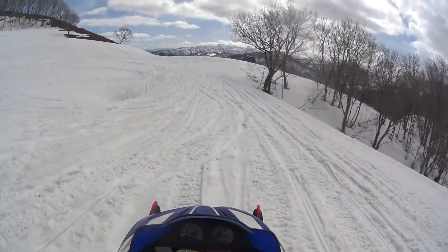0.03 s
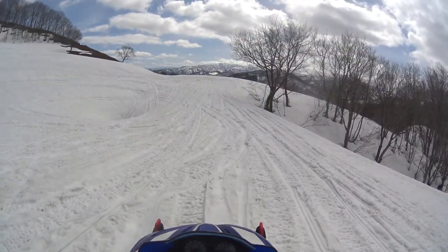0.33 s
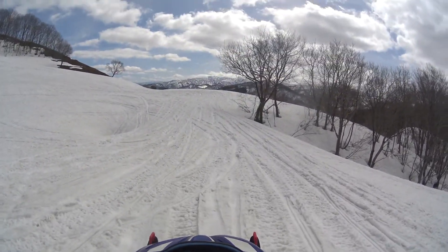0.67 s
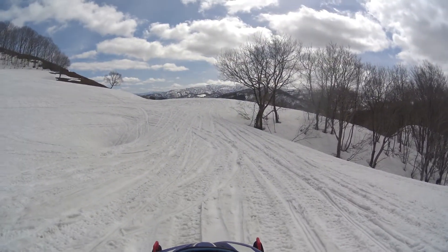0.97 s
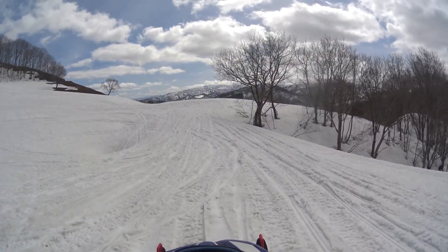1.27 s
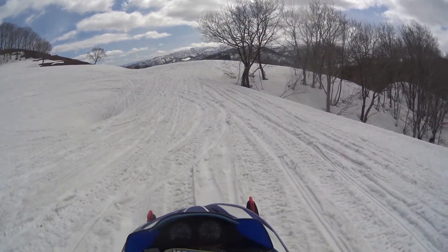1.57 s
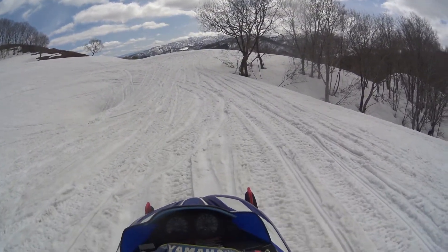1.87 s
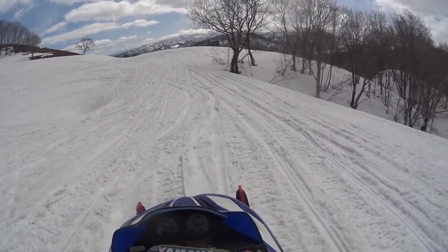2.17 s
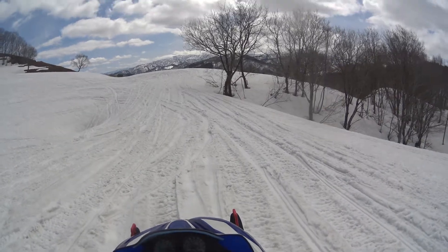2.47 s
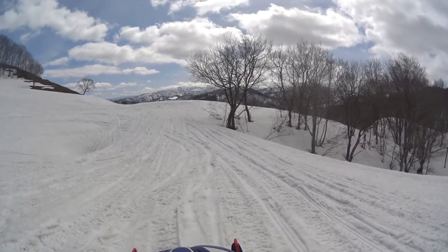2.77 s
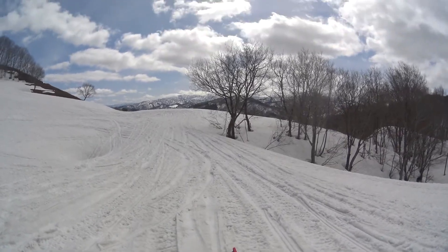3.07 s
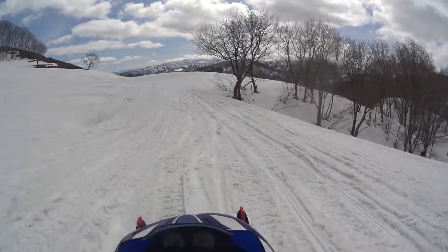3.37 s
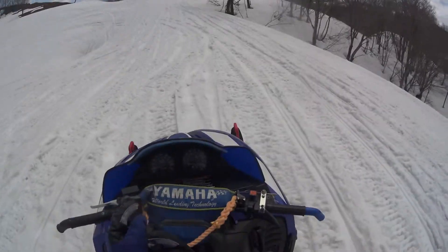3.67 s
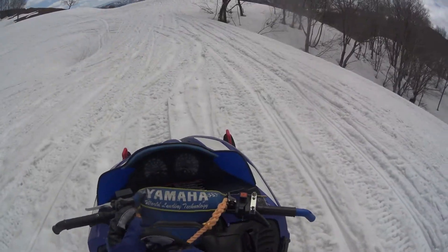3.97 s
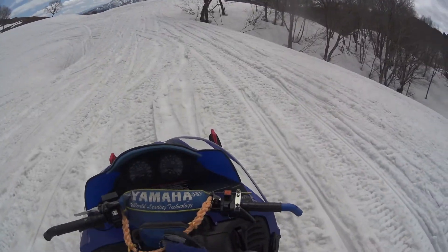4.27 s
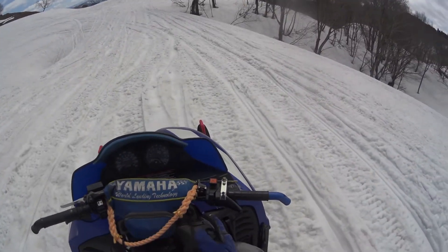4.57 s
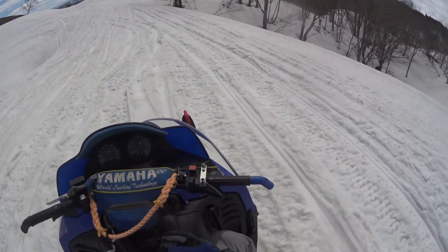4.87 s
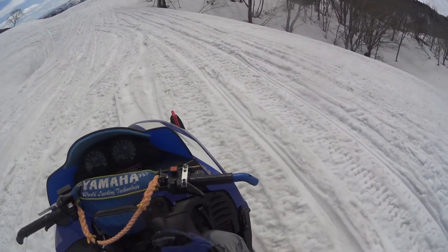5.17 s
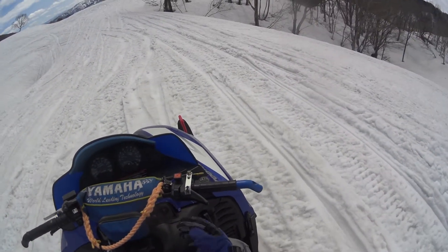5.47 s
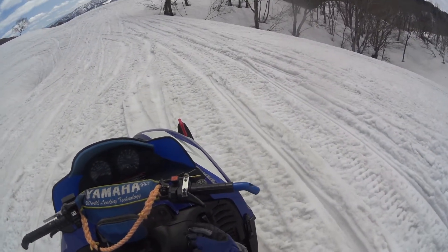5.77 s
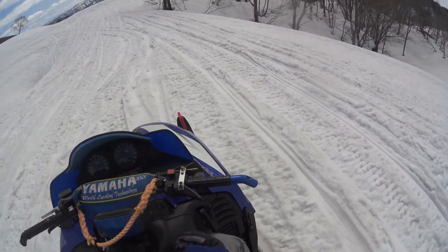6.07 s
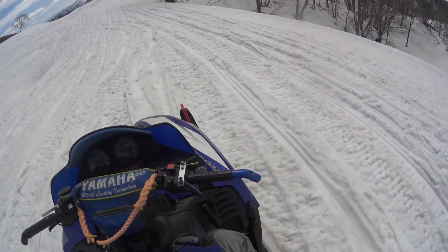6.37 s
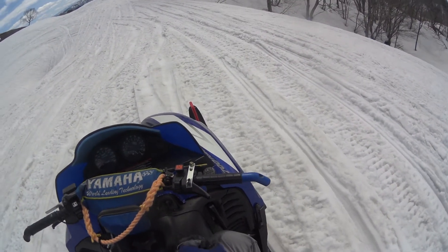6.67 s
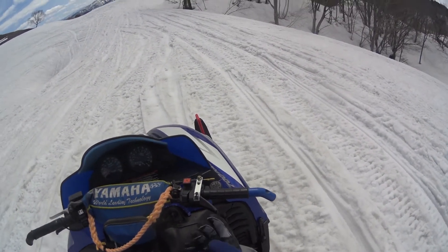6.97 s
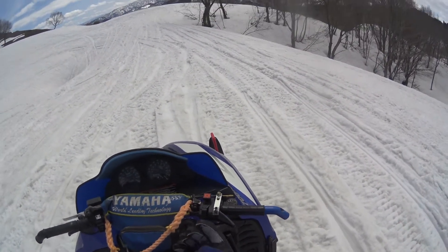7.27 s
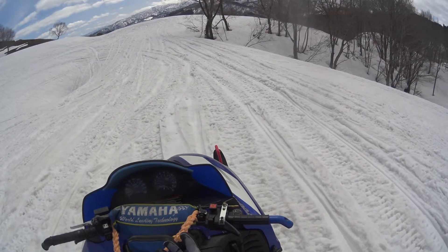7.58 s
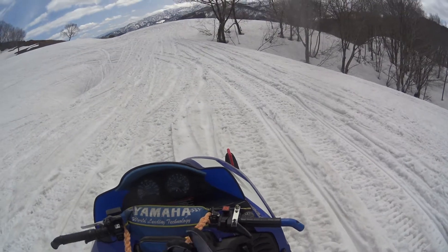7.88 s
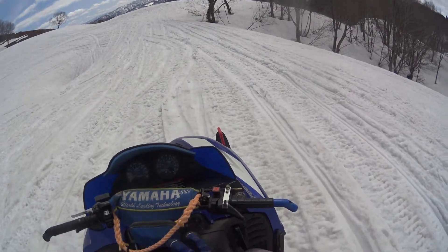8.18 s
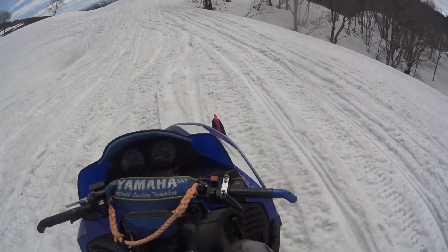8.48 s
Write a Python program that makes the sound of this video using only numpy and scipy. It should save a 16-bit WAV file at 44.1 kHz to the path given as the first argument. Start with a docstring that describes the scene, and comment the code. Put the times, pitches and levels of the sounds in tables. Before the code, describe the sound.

A two-stroke snowmobile engine idles close by for about eight and a half seconds, heard outdoors from a microphone on the rider's head. The exhaust has a low, lumpy throb, with stronger pops coming unevenly several times a second, and its pitch wavers only slightly. Over it run a fine mechanical clatter and the fast metallic rattle of a loose clutch. Sharp, briefly ringing knocks come at irregular moments throughout, along with occasional faint, high buzzes of small metal parts.

The engine swells a little around 2 seconds, where a dull double thud bumps the microphone, then eases back. At about 3.5 seconds comes a second cluster of thuds with a plastic knock and a short rub. From there the engine sounds closer and a little louder, with more prominent rattle and slightly thinner bass, and it keeps idling to the end.

```python
"""Snowmobile idling on a snowy slope

A three-cylinder two-stroke, heard from a camera on the rider's head. Every stroke pumps the exhaust
pipe, but only some burn hard. The loose clutch rattles once a turn over the engine's clatter, with a
hard knock now and then. The camera is bumped twice; the engine swells as the rider leans in, and
its tone shifts as the rider looks down."""
import sys
import numpy as np
from scipy import signal
from scipy.fft import rfft, irfft, next_fast_len
from scipy.io import wavfile
from scipy.ndimage import uniform_filter1d

SR = 44100
rng = np.random.default_rng(int(sys.argv[2]) if len(sys.argv) > 2 else 0)


def dump(signal):
    """Clip the signal to [-1, 1] and save it as 16-bit WAV at the path in sys.argv[1]."""
    limited = np.clip(np.atleast_2d(signal).T, -1, 1)
    pcm = np.round(limited * 32767).astype(np.int16)
    wavfile.write(sys.argv[1], SR, pcm)


N = 380141
T = np.arange(N) / SR
SIZE = next_fast_len(N + SR // 2)
FREQ = np.arange(SIZE // 2 + 1) * SR / SIZE

# the rider's head: (time [s], tilt [0 looking ahead, 1 down at the hood])
HEAD_TILT = [(0, 0.021), (3.36, 0), (3.52, 0.46), (4.4, 0.89), (8.62, 0.69)]
# pumping strength, one value a cylinder: (level [dB])
CYLINDER_LEVELS = [-0.5, -7.5, 4]
# clutch resonances: (frequency [Hz], width [Hz], level [dB])
CLUTCH_MODES = [(1048, 33, -18), (1123, 66, -15), (1238, 54.6, -3), (1312.6, 40, 0.5), (1353, 59, -1.5),
                (1404, 46, -3.5), (1581, 49, -10), (2022, 29, -12), (2130.5, 23, -9.5), (2685, 79, -20),
                (4900, 310, -38.5)]
# hardest clutch knocks, and at 3.43 s a ring struck along with the camera's bump: (time [s], relative peak
# [dB], ring pitch [Hz], nominal ring length [s])
HARD_KNOCKS = [(0.025, -9.5, 1290, 0.015), (0.085, -12.5, 1280, 0.0078), (0.4587, -8.5, 1420, 0.0056),
               (0.815, -9.5, 1300, 0.0057), (0.9718, -10.5, 1300, 0.0061), (1.159, -19, 1320, 0.0088),
               (1.27, -12, 1260, 0.017), (1.9218, -5, 1326, 0.006), (2.0137, -4, 1470, 0.0068),
               (2.174, -7.5, 1346, 0.0111), (2.219, -9, 1440, 0.0089), (2.579, -14, 1310, 0.013),
               (2.7405, -13, 1360, 0.0065), (2.79, -13.1, 1330, 0.007), (3.065, -13.5, 1380, 0.0065),
               (3.113, -12, 1365, 0.012), (3.4278, -9, 1290, 0.0055), (3.638, -4.5, 1240, 0.0084),
               (4.2412, -6, 1330, 0.0126), (4.5756, -4.5, 1310, 0.0061), (4.7646, -7, 1325, 0.021),
               (4.8688, -7.5, 1350, 0.0036), (5.1895, -10.0, 1320, 0.0064), (5.2799, -6, 1333, 0.0088),
               (5.557, -3.5, 1360, 0.016), (5.6363, -10.5, 1315, 0.0072), (5.9727, -6, 1287, 0.0062),
               (6.3368, -10.5, 1313, 0.0118), (6.5605, -6, 1320, 0.0081), (6.6743, -7.8, 1420, 0.0059),
               (7.032, -6, 1290, 0.0055), (7.1185, -8.5, 1360, 0.0043), (7.5676, -8, 1380, 0.011),
               (7.7284, -5.5, 1385, 0.0069), (7.7705, -13, 1350, 0.0072), (7.92, -9.5, 1330, 0.0096),
               (7.9532, -6.5, 1320, 0.0071), (8.018, -9.5, 1316, 0.013), (8.0525, -13.5, 1365, 0.0049),
               (8.295, -10.5, 1330, 0.0062), (8.3845, -5, 1300, 0.0076), (8.4288, -6.5, 1380, 0.007),
               (8.5115, -6.5, 1300, 0.012), (8.549, -9, 1341, 0.007)]


def amp(db):
    """Decibels to gain."""
    return 10 ** (np.asarray(db) / 20)


def unit(x):
    """Scale to a standard deviation of 1."""
    return x / np.std(x)


def curve(rows):
    """A (time, value) table as an automation curve."""
    return np.interp(T, *np.transpose(rows))


def shape(points):
    """A (frequency, value) table drawn over log frequency."""
    hz, value = np.transpose(points)
    return np.interp(np.log(FREQ + 1), np.log(hz), value)


def through(x, response):
    """Filter by a frequency response."""
    return irfft(rfft(x, SIZE) * response, SIZE)[:N]


def causal(gain):
    """The response with this gain that rings only after it is struck."""
    cepstrum = irfft(np.log(gain + 1e-6), SIZE)
    cepstrum[1:SIZE // 2] *= 2
    cepstrum[SIZE // 2 + 1:] = 0
    return np.exp(rfft(cepstrum))


def body(modes, skirt):
    """Response of (frequency, width, level) resonances; a higher skirt makes deeper valleys."""
    power = 0
    for hz, width, db in modes:
        detuning = (FREQ ** 2 - hz ** 2) / (FREQ * width + 1)
        power += amp(2 * db) / (1 + detuning ** 2 / skirt) ** skirt
    return causal(np.sqrt(power))


def clicks(times, sizes):
    """Single clicks at the given times."""
    return np.bincount(np.clip(np.asarray(times) * SR, 0, N - 1).astype(int), sizes, N)


def noise():
    """White noise."""
    return rng.standard_normal(N)


def wobble(hz):
    """Random drift of spread 1, rolling off above hz."""
    return unit(through(noise(), np.exp(-(FREQ / hz) ** 2)))


def hiss(level_db=-48.0):
    """The microphone's noise floor: a low rumble with faint hiss on top."""
    # (frequency [Hz], relative level [dB])
    floor_eq = [(20, 9.5), (60, 28.5), (300, 12), (2000, -42), (8000, -7.5), (11000, -12.5)]
    return unit(through(noise(), amp(shape(floor_eq)))) * amp(level_db)


def shake(turns, ahead_db=-50, down_db=-55):
    """The crankshaft rocks the whole sled once a turn."""
    return np.sin(2 * np.pi * turns) * amp(ahead_db + curve(HEAD_TILT) * (down_db - ahead_db))


def tinkles(fade_s=0.0192, grain_db=3):
    """Small loose metal parts buzz briefly in the engine bay."""
    # metallic ticks: (time [s], level [dB])
    ticks = [(0.179, -49), (0.584, -46), (1.056, -51), (1.854, -43), (2.463, -44), (5.115, -40),
             (5.325, -40), (7.163, -42), (7.806, -50), (8.227, -43), (8.563, -46)]
    swell = sum(amp(db) * np.exp(-abs(T - s) / fade_s) for s, db in ticks)
    metal = body([(3900, 300, -5), (4450, 300, -5), (4920, 430, 0.5), (5450, 600, -7)], skirt=1.4)
    grit = noise() * amp(grain_db * noise())
    return unit(through(grit, metal)) * swell


def bumps(rub_db=-9, rub_s=0.061):
    """Dull thuds in the camera mount, each with a plastic knock and a short rub."""
    # two clusters of hits: (time [s], thud peak [dB], knock against thud [dB])
    hits = [(2.122, -9.5, -34), (2.17, -14, -30), (3.427, -15.5, -21), (3.455, -9.5, -2),
            (3.47, -14.5, -26), (3.529, -16.5, -19), (3.552, -12, -11)]
    mount = body([(42, 26, -4), (62, 22, -6), (103.3, 22, 12), (152, 200, -1), (360, 170, -11)],
                 skirt=2.7)
    case = body([(460, 180, 1), (675, 110, 3), (1100, 180, -7), (1900, 600, -18)], skirt=2.3)
    times, db, knock_db = np.transpose(hits)
    blows = clicks(times, amp(db))
    tails = signal.lfilter([1], [1, -np.exp(-1 / (rub_s * SR))], blows)
    rub = tails * noise() * amp(rub_db) / np.sqrt(rub_s * SR)
    thuds = through(blows + rub, mount / abs(irfft(mount)).max())
    plastic = through(clicks(times, amp(db + knock_db)), case / abs(irfft(case)).max())
    return thuds + plastic


def treble_drift(x, edge_hz=3200):
    """The top end rises and falls a little."""
    # high shelf: (time [s], gain [dB])
    shelf = [(0, 1), (1.3, 0), (1.6, .5), (2.4, 0.5), (2.7, 0), (3.25, -0.5), (3.5, -0.5), (4.5, -0.6),
             (5.2, -0.7), (5.7, -.3), (6.5, 1.5), (7.5, -0.7043), (8.62, 0)]
    highs = through(x, 1 - 1 / (1 + (FREQ / edge_hz) ** 8))
    return x + highs * (amp(curve(shelf)) - 1)


def clatter(turns, slap, level_db, turn_db=0.92, stroke_db=0.17, slap_db=0.84, flutter_db=0.57):
    """Pistons, fan and intake: fine ticks that swell with each turn, stroke and burn."""
    # tone looking ahead, shaded by the windscreen: (frequency [Hz], gain [dB])
    ahead_eq = [(300, -8.5), (480, 15), (700, 16.5), (810, 10.5), (1000, 17.5), (1500, 23), (1720, 20),
                (2050, 23), (2300, 13.5), (2800, 15), (3400, 2), (4300, -3.5), (5000, -3), (6200, -9),
                (8000, -25)]
    # tone looking down: (frequency [Hz], gain [dB])
    down_eq = [(300, -1.5), (480, 12.5), (800, 7.5), (1050, 14), (1550, 23), (1950, 23), (2140, 15),
               (2350, 5.5), (2800, 10.5), (3300, 3), (4000, 2.5), (5000, -1.7), (6500, -9), (8000, -27)]
    down = curve(HEAD_TILT)
    ticks = unit(noise() * amp(4.0 * noise()))  # 4 dB of grain
    beat_db = turn_db * np.cos(2 * np.pi * clutch_turns(turns))
    beat_db += stroke_db * np.cos(2 * np.pi * len(CYLINDER_LEVELS) * turns)
    ticks *= amp(beat_db + slap_db * slap + flutter_db * wobble(hz=34))
    shaded = through(ticks, causal(amp(shape(ahead_eq))))
    exposed = through(ticks, causal(amp(shape(down_eq))))
    return treble_drift((1 - down) * shaded + down * exposed) * amp(level_db)


def clutch_turns(turns):
    """The turn count, nudged so that the clutch's play closes right on each hard knock."""
    times = np.transpose(HARD_KNOCKS)[0]
    at_knocks = np.interp(times, T, turns)
    turns_between = np.maximum(np.round(np.diff(at_knocks)), 1)
    whole = np.append(0, np.cumsum(turns_between))
    return turns + np.interp(T, times, whole - at_knocks)


def sheave_ring():
    """One knock on the sheaves: a quick run of contacts, so the ring builds over a few cycles."""
    smear = np.exp(-2j * np.arctan2(FREQ * 700, 1330 ** 2 - FREQ ** 2))
    ring = irfft(body(CLUTCH_MODES, skirt=1.69) * smear)[:SR // 8]
    return ring / abs(ring).max()


def clutch_rattle(turns, level_db, fade_db=4.0, taps_per_s=4000, blow_db=3, uneven_db=2.0,
                  ceiling_db=5, lull_db=2, lull_s=0.012, hood_db=-11):
    """Once a turn the loose weights hit the sheaves, then chatter in their play; the hood rings along."""
    # hood resonances, heard with the head up: (frequency [Hz], width [Hz], level [dB])
    hood_modes = [(1013.5, 16.6, -3), (1127, 17.6, 2), (1238, 11.6, 2), (2074, 14, -6.5)]
    play = clutch_turns(turns)
    taps = (rng.random(N) < taps_per_s / SR) * np.sign(noise())
    taps *= amp(-fade_db * (play % 1))
    times = T[1:][np.diff(np.floor(play)) > 0]
    blows = clicks(times, amp(blow_db + uneven_db * rng.standard_normal(len(times))))
    chatter = unit(through(taps, body(CLUTCH_MODES, skirt=1.65)))
    chatter += signal.fftconvolve(blows, sheave_ring())[:N]
    power = uniform_filter1d(chatter ** 2, SR // 150) / amp(2 * ceiling_db)
    chatter /= (1 + power ** 2) ** .25  # soft limiter
    # around a hard knock the weights lift clear and the chatter ducks
    hard_times = np.transpose(HARD_KNOCKS)[0]
    nearest = np.searchsorted((hard_times[1:] + hard_times[:-1]) / 2, T)
    lifted = np.exp(-((T - hard_times[nearest]) / lull_s) ** 2 / 2)
    hood = unit(through(taps, body(hood_modes, skirt=1.64))) * amp(hood_db) * (1 - curve(HEAD_TILT))
    return (chatter * amp(-lull_db * lifted) + hood) * amp(level_db)


def hard_knocks(gain_db=-4.5, crack_db=-13, lead_s=0.002993, decay_share=0.33):
    """A weight slams home: the sheaves crack and ring, with pitch and length set by where it lands."""
    track, crack = np.zeros(N + SR), sheave_ring()
    for s, db, hz, length in HARD_KNOCKS:
        decay_s = max(length * decay_share, .001)
        mode = signal.iirpeak(hz, np.pi * hz * decay_s, fs=SR)
        ring = signal.lfilter(*mode, signal.lfilter(*mode, crack))  # two passes make it swell
        knock = ring / abs(ring).max() + amp(crack_db) * crack
        start = max(int((s - lead_s) * SR), 0)
        track[start:start + len(knock)] += knock / abs(knock).max() * amp(db + gain_db)
    return track[:N]


def burns(strokes, every=5.6, stray_strokes=0.66, strong_db=-6.0, uneven_db=0.54,
          weak_db=-22, scatter_db=3.5):
    """Burn strength per stroke: feeble in spent gas, strong every few strokes once it has cleared."""
    # hardest burns: (time [s], level above an ordinary strong burn [dB])
    thumps = [(0.002, 2.5), (0.168, 1.5), (0.363, 0.5), (0.768, 2.3), (0.961, 3), (1.051, 1.5),
              (1.245, 3.5), (1.394, 2), (1.759, 0.3), (2.486, -0.3), (2.767, 2.5), (3.09, 1.3), (3.34, 3.5),
              (3.702, 2.5), (3.902, 3), (4.396, 3.2), (4.477, 4), (4.932, 0.5), (5.314, 2.2), (5.509, 1.5),
              (5.715, 0.5), (6.09, 2), (6.213, 2), (6.274, 0.7), (6.34, 2), (6.46, 2), (6.62, 1.5),
              (6.673, 1), (6.742, 2.5), (6.821, 0.5), (6.94, 0.5), (7.104, 1.7), (7.347, 0.5), (7.55, 1.3),
              (7.878, 2.4), (8.002, 2.8), (8.287, 2), (8.543, 3)]
    times, db = np.transpose(thumps)
    hardest = abs(strokes[:, None] - times).argmin(axis=0)
    # ordinary strong burns fill the gaps between the hardest
    burns_between = np.maximum(np.round(np.diff(hardest) / every), 1)
    counted = np.append(0, np.cumsum(burns_between))
    ordinary = np.setdiff1d(np.arange(counted[-1]), counted)
    stray, size = rng.standard_normal((len(ordinary), 2)).T
    due = np.round(np.interp(ordinary, counted, hardest) + stray_strokes * stray).astype(int)
    strong = np.zeros(len(strokes))
    strong[np.clip(due, 0, len(strokes) - 1)] = amp(strong_db + uneven_db * size)
    strong[hardest] = amp(strong_db + db)
    feeble = amp(weak_db + scatter_db * rng.standard_normal(len(strokes)))
    surge = amp([-12, -4.5, 0, -13, weak_db])  # builds over two strokes, then collapses
    return np.maximum(np.convolve(strong, surge, "same"), feeble)


def exhaust_pipe():
    """The pipe's response: it resonates, silencer chambers delay each pulse, side branches cut notches."""
    # pipe resonances: (frequency [Hz], width [Hz], level [dB])
    pipe_modes = [(82, 4, 4.5), (116.4, 18.8, 10.5), (143.2, 16.8, 3), (198.3, 26.4, 5.5),
                  (222.54, 9.2, 3.5), (256.8, 25.4, 7), (320, 42.7, 5), (319, 25, -3), (398, 35, -9.5),
                  (498, 25, -20), (584.5, 49, -12.5), (706, 36.5, -11)]
    # silencer chambers: (frequency [Hz], width [Hz])
    chambers = [(125, 400), (215, 49), (255, 340), (330, 160), (600, 500)]
    # side branches: (cancelled frequency [Hz], width [Hz])
    branches = [(173, 5.6), (281, 3)]
    lag = 2 * sum(np.arctan2(FREQ * width, hz ** 2 - FREQ ** 2) for hz, width in chambers)
    response = body(pipe_modes, skirt=2.9) * np.exp(-1j * lag)
    for hz, width in branches:
        response *= (hz ** 2 - FREQ ** 2) / (hz ** 2 - FREQ ** 2 + 1j * FREQ * width)
    return response


def exhaust(strokes, burn, level_db, pump_jitter_s=0.00069, burn_jitter_s=0.00045, bass_cut_db=7.0):
    """Each stroke pumps the pipe and each burn adds a sharper blast; looking down thins the bass."""
    # tone of the soft unburnt stroke: (frequency [Hz], gain [dB])
    pump_eq = [(40, -9), (74, -4), (148, -24.5), (222, -6), (296, -21.5), (450, -11.5), (800, -10.5)]
    pump_slip, burn_slip = rng.standard_normal((len(strokes), 2)).T
    puffs = clicks(strokes + pump_jitter_s * pump_slip, np.resize(amp(CYLINDER_LEVELS), len(strokes)))
    blasts = clicks(strokes + burn_jitter_s * burn_slip, burn)
    gas = through(puffs, amp(shape(pump_eq))) + blasts
    pipe = through(gas, exhaust_pipe())
    bass = through(pipe, 1 / (1 + (FREQ / 170) ** 8))
    bass_gain = amp(-bass_cut_db * curve(HEAD_TILT))
    return unit(pipe + bass * (bass_gain - 1)) * amp(level_db)


def microphone_ports(direct, scattered):
    """Stereo: the left port is shaded, hears later and picks up scatter from hood and helmet."""
    # left against right: (frequency [Hz], phase lead [rad])
    left_phase = [(30, -0.5), (100, -0.7), (250, -1), (520, -1.5), (860, -1.84), (1380, -1.7), (1700, -2.5),
                  (2330, -2.5), (2700, -6.5), (3200, -5.5), (4000, -5.5), (6600, -5), (8400, -7)]
    # left against right: (frequency [Hz], gain [dB])
    left_eq = [(40, 0), (120, -2.5), (300, -2.5), (620, -2), (860, -2), (1100, -0.5), (1350, -6.5),
               (1560, -4), (1850, -11.5), (2500, -7.5), (2850, -13.5), (3800, -5), (5000, -6.5),
               (7500, -1.5)]
    # scattered sound on the left: (frequency [Hz], share of power [0-1])
    scatter_share = [(100, 0), (600, 0.36), (800, 0.15), (1300, 0), (2100, 0.05), (2450, 1), (5000, 0.08),
                     (7000, 0.6)]
    share, shade = shape(scatter_share), amp(shape(left_eq))
    left = through(direct, shade * np.sqrt(1 - share) * np.exp(1j * shape(left_phase)))
    left += through(scattered, shade * np.sqrt(share))
    return np.array([left, direct])


def scene(hunting=0.015):
    """One crankshaft, hunting around idle, drives exhaust, clutch and clatter; leaning in lifts them."""
    # idle speed: (time [s], firing rate [Hz])
    idle_speed = [(0, 71.45), (0.5, 72.27), (0.95, 76.1), (1.25, 74.57), (3.4, 73), (3.93, 74.91),
                  (4.2, 72.92), (6.2, 72.74), (6.9, 74.45), (7.35, 73.05), (8.62, 73.34)]
    # the rider's posture: (time [s], lean [0 upright, 1 close over the engine])
    posture = [(0, 0.39), (0.45, 0.095), (1.25, 0.017), (1.8, 0.42), (2.35, 0.39), (2.75, 0.061),
               (3.35, 0.041), (3.55, 0.87), (4.05, 0.73), (5, 1.0), (5.8, 0.78), (6.7, 0.99), (7.6, 0.77),
               (8.62, 0.99)]
    # exhaust swell as the head turns towards the pipe: (time [s], gain [dB])
    facing_pipe = [(0, -0.5), (4.3, 0.5), (5.4, 2), (7, 2.5), (8.62, 1.3)]
    lean = curve(posture)
    firing_hz = curve(idle_speed) * (1 + hunting * wobble(hz=10.2))
    cycles = np.cumsum(firing_hz) / SR
    strokes = T[np.diff(np.floor(cycles), prepend=-1) > 0]
    turns = cycles / len(CYLINDER_LEVELS)
    burn = burns(strokes)
    slap = unit(np.interp(T, strokes, burn - burn.mean()))
    # the engine bay twice over: same rhythm, independent grain
    bay, scattered = (clutch_rattle(turns, level_db=-22 + 4 * lean) + tinkles()
                      + clatter(turns, slap, level_db=-37.5 + 5 * lean) for _ in range(2))
    pipe = exhaust(strokes, burn, level_db=-25 + 2.5 * lean + curve(facing_pipe))
    direct = pipe + bay + shake(turns) + hard_knocks() + bumps()
    return microphone_ports(direct, scattered) + hiss()


def record(dry):
    """The camera cuts the top steeply above 11 kHz."""
    return signal.sosfilt(signal.ellip(12, .1, 80, 11050, fs=SR, output="sos"), dry)


dry = scene()
out = record(dry)
dump(out)
```